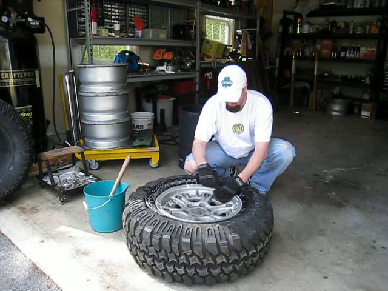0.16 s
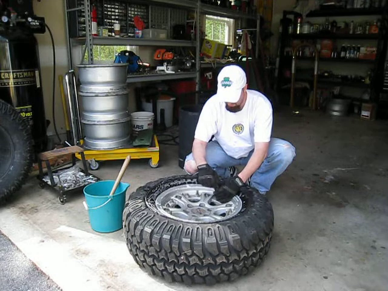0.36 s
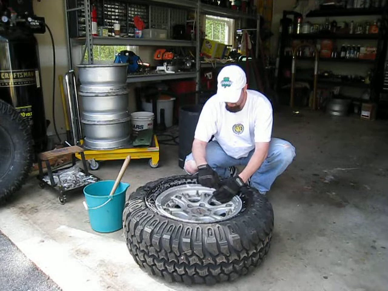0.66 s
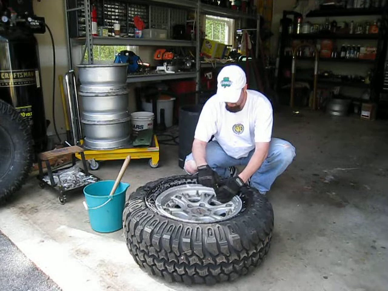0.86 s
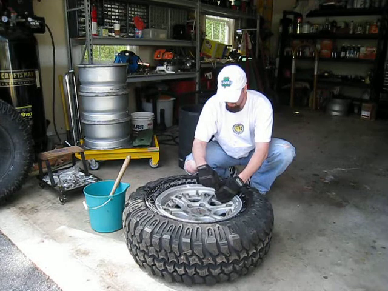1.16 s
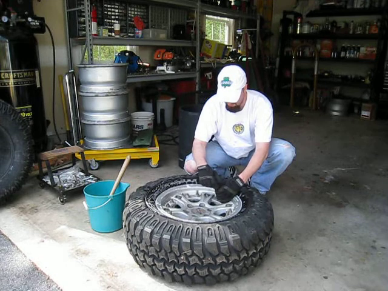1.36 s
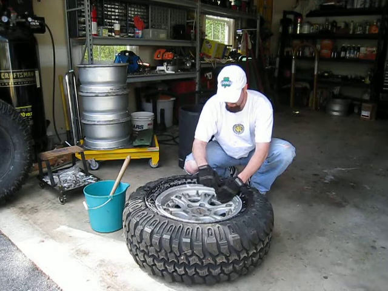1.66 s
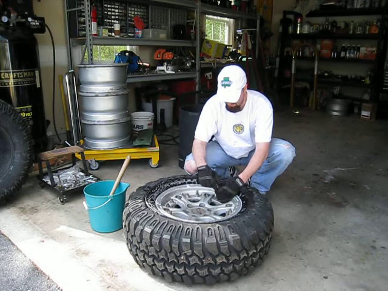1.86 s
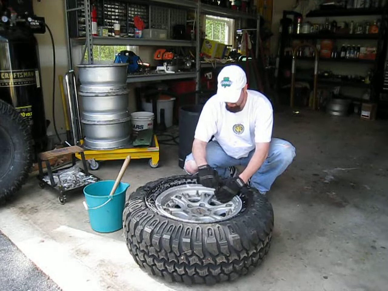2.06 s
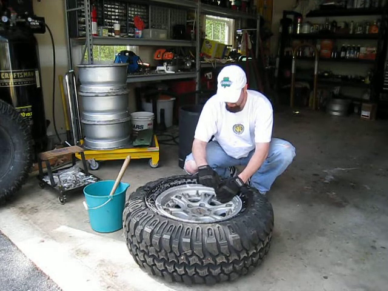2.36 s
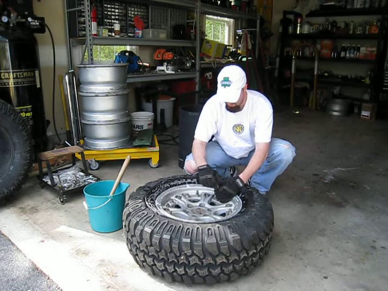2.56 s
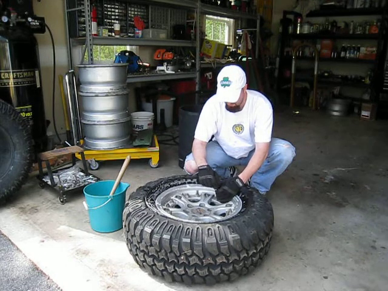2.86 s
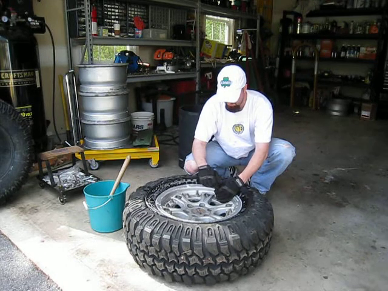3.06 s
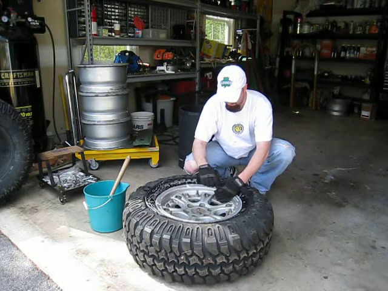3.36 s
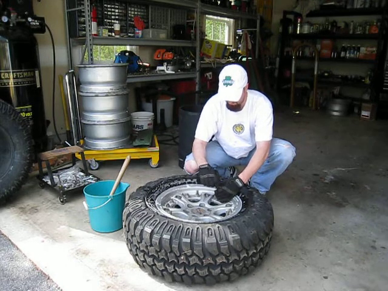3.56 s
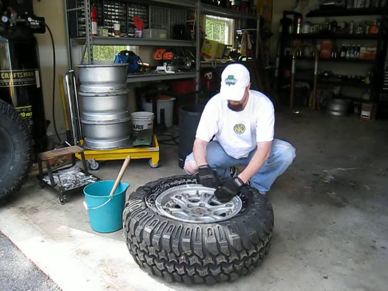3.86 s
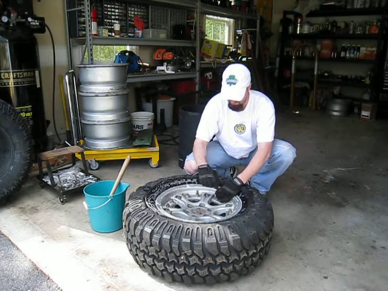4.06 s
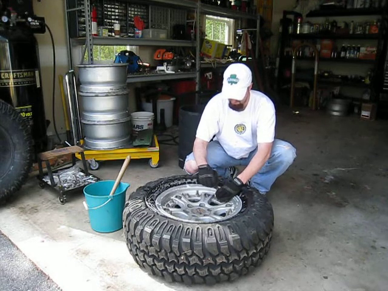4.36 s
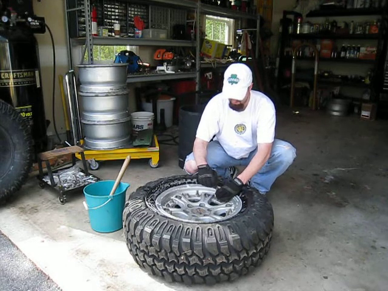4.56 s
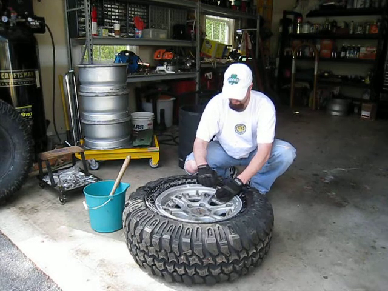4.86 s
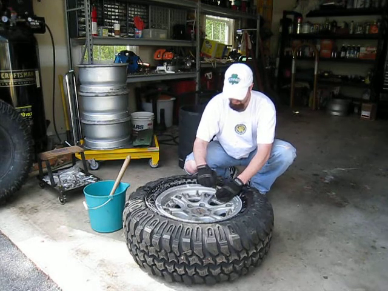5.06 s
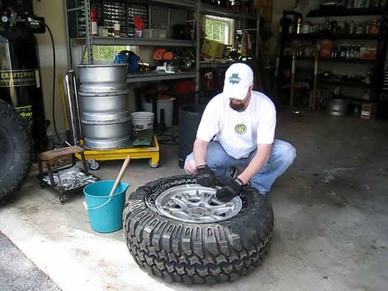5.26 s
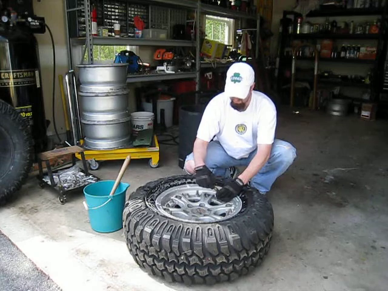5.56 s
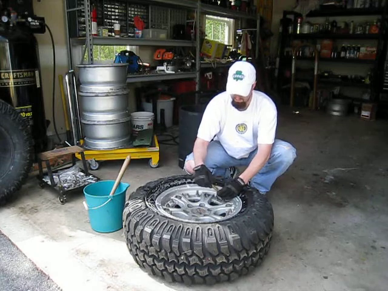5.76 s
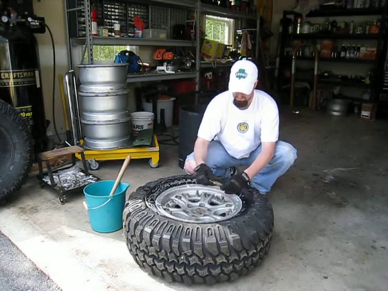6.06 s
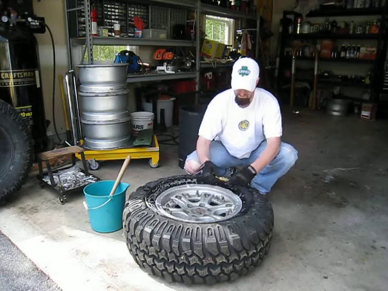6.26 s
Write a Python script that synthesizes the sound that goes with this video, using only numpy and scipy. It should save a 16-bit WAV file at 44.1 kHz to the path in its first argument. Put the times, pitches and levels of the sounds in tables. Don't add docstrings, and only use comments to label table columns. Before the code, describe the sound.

Thin stuttering air leaks with faint tool knocks over a quiet garage hum, then a sudden snap and loud, whistling, steady rush of escaping air.

```python
import sys
import numpy as np
from scipy import signal
from scipy.fft import irfft, next_fast_len
from scipy.io import wavfile
from scipy.ndimage import uniform_filter1d, map_coordinates

SR = 44100
rng = np.random.default_rng(int(sys.argv[2]) if len(sys.argv) > 2 else 0)


def attenuation_scalar(level_db):
    decades = np.asarray(level_db, float) / 20
    return 10 ** decades


def materialize(psi):
    bounded = np.clip(np.atleast_2d(psi).T, -1, 1)
    quanta = np.round(bounded * 32767).astype(np.int16)
    wavfile.write(sys.argv[1], SR, quanta)


N = 282353

# [f/Hz, density/dB]
CORE_SPECTRUM = [(2500, -19), (3500, -2.5), (5000, 0.5), (5450, 0), (6000, -0.5), (7500, -2), (10000, -1),
                 (12000, -18), (14000, -28)]
BODY_SPECTRUM = [(700, -14), (1200, 0), (1750, 1), (2400, 4), (2900, 0.5), (3300, 0), (4500, -14)]
ROAR_SPECTRUM = [(20, -25), (60, -22), (130, -26), (190, -12.5), (280, -20.5), (360, -13), (440, -16.5),
                 (500, -3), (620, -2.5), (800, 1.5), (1100, -3), (1600, -14)]

PUFF_RISE_S, PUFF_FALL_DB_S = 0.02, 600
RIM_RISE_S, RIM_FALL_DB_S = 0.035, 300


def evened(x):
    return x / np.sqrt(np.mean(x ** 2) + 1e-20)


def curve(points):
    return np.interp(np.arange(N) / SR, *np.transpose(points))


def shaped(gain):
    size = next_fast_len(N)
    hz = np.fft.rfftfreq(size, 1 / SR)
    real, imaginary = rng.standard_normal((2, len(hz)))
    spectrum = (real + 1j * imaginary) * gain(hz)
    return evened(irfft(spectrum, size)[:N])


def noise(points):
    f, db = np.transpose(points)

    def gain(hz):
        return attenuation_scalar(np.interp(np.log(hz + 1), np.log(f + 1), db, left=-90, right=-90))

    return shaped(gain)


def whistle(*peaks):
    def gain(hz):
        return sum(attenuation_scalar(db) / (1 + (2 * (hz - f) / (1.76 * width)) ** 2) for f, width, db in peaks)

    return shaped(gain)


def slow_noise(span):
    return evened(uniform_filter1d(uniform_filter1d(rng.standard_normal(N), span), span))


def eddies(depth_db, seconds):
    span = max(int(seconds * SR), 1)
    return evened(attenuation_scalar(depth_db * slow_noise(span)))


def swell(start, hold, db, rise, fall_db_s):
    t = np.arange(0, N + 40, 40) / SR - start
    fall = attenuation_scalar(db - fall_db_s * np.maximum(t - hold, 0))
    power = (np.clip(t / rise, 0, 1) * fall) ** 2
    return np.repeat(power, 40)[:N]


def staged(levels):
    # [t/s, glide/s]
    moves = [
        (4.07, 0.14),
        (5.22, 0.07),
        (6.02, 0.13),
    ]
    t = np.arange(N) / SR
    value = levels[0]
    for step, (s, glide) in zip(np.diff(levels), moves):
        value = value + step * np.clip((t - s) / glide + .5, 0, 1)
    return value


def garage():
    # [f/Hz, density/dB]
    room_spectrum = [(12, -49), (20, -10), (70, -10), (182, -6.5), (346, -7), (556, -5), (1120, -5.5),
                     (1220, -8.5), (1320, -10), (2070, -15.5), (2250, -17), (7480, -23), (15900, -20)]
    # [f/Hz, width/Hz, level/dB]
    hum_lines = [(103.6, 8.5, -67), (203, 83, -89)]
    wash = attenuation_scalar(-49.95) * noise(room_spectrum) * eddies(depth_db=0.07, seconds=0.038)
    hum = sum(attenuation_scalar(db) * whistle((hz, width, 0)) for hz, width, db in hum_lines)
    duck_s, glide_s, duck_db, creep_db_s = 3.12, 0.1, -10, -3.5
    t = np.maximum(np.arange(N) / SR - duck_s, 0)
    return attenuation_scalar(.5 + duck_db * np.minimum(t / glide_s, 1) + creep_db_s * t) * (wash + hum)


def leak():
    # [t/s, hold/s, level/dB, whistle over fizz/dB]
    puff_rows = [(-.02, 0.085, -44, 4), (0.08, 0.048, -46.5, 10), (.13, 0.051, -57, 0), (0.24, .06, -56, 3),
                 (0.287, 0.055, -41, 0), (0.335, 0.036, -41.5, 1), (.385, 0.57, -53, -1),
                 (0.388, 0.049, -52, 10), (0.514, 0.054, -49.5, -3), (0.668, 0.074, -48, 7),
                 (0.82, 0.1, -52, 3), (1.048, .02, -54, -5), (1.119, 0.061, -49, -3),
                 (1.238, 0.031, -46.5, -2), (1.312, 0.082, -51, -1), (1.335, 0.26, -55, 1),
                 (1.598, 0.16, -63, 5), (1.725, 0.061, -54.5, 11), (1.784, 0.1, -55.5, -2),
                 (1.895, 0.027, -50.5, 0), (2.096, 0.37, -51.5, 1), (2.415, 0.22, -50, -2),
                 (2.63, 0.24, -49, -2), (2.83, 0.066, -48, -3), (2.89, 0.14, -46.5, -1)]
    # [t/s, hold/s, level/dB]
    cupped_rows = [(-.02, 0.087, -54.5), (0.293, .035, -48), (0.34, 0.026, -46.5), (1.12, .03, -53),
                   (1.17, .03, -56), (1.243, 0.027, -44), (2.35, .1, -56), (2.422, 0.15, -49.5),
                   (2.649, 0.097, -49), (2.76, 0.15, -59), (2.92, .06, -53), (2.97, 0.087, -44.5)]
    # [f/Hz, width/Hz, level/dB]
    thread_peaks = [(8150, 260, -3.5), (8800, 230, -9), (9330, 170, 2), (9870, 170, 0), (10600, 220, -13)]
    edge_peaks = [(12060, 250, -7), (13100, 300, -6), (14300, 500, -13), (15300, 400, -13)]
    seat_peaks = [(5040, 380, 0), (6540, 190, -6), (4080, 160, -21)]
    # [f/Hz, density/dB]
    fizz_spectrum = [(6180, -19), (10500, 1.5), (11600, 5.5), (11800, -7), (12500, 6), (12800, -1),
                     (14200, 6), (15900, -1)]
    body_spectrum = [(940, -25), (1600, -6.5), (1710, -5), (2450, 1), (2720, -4), (4050, -2.5),
                     (5910, -2.5), (6830, -2.5), (7590, 1.5), (9440, -3.5), (11000, -7), (14300, -28),
                     (22000, -120)]

    puffs = [swell(s, hold, db, PUFF_RISE_S, PUFF_FALL_DB_S) for s, hold, db, _ in puff_rows]
    bias = [attenuation_scalar(row[3]) for row in puff_rows]
    seep = attenuation_scalar(-70) ** 2
    thin = np.sqrt(seep + sum(p * b for p, b in zip(puffs, bias)))
    fizz = np.sqrt(seep + sum(p / b for p, b in zip(puffs, bias)))
    body_follows = 0.32
    body = attenuation_scalar(-56.5) * ((seep + sum(puffs)) / attenuation_scalar(-50.5) ** 2) ** (body_follows / 2)
    cupped = np.sqrt(seep + sum(swell(*row, PUFF_RISE_S, PUFF_FALL_DB_S) for row in cupped_rows))

    air = attenuation_scalar(-3.0) * thin * whistle(*thread_peaks) * eddies(depth_db=1.5, seconds=.02)
    air += cupped * whistle((1370, 170, 0))
    bright = noise(fizz_spectrum) + 0.43 * whistle(*edge_peaks)
    air += attenuation_scalar(-1.0) * fizz * bright * eddies(depth_db=0.5, seconds=.02)
    air += (attenuation_scalar(3.0) * body + 0.51 * cupped) * (noise(body_spectrum) + 0.31 * whistle(*seat_peaks))
    return (air + squeaks()) * eddies(depth_db=.8, seconds=.005)


def squeaks():
    # [t/s, hold/s, level/dB, f/Hz]
    squeak_rows = [(.03, .05, -57, 14600), (.3, .07, -57, 14300), (.51, .07, -59, 5200),
                   (.52, .05, -54, 14100), (.68, .07, -58, 14200), (2.43, 0.068, -51, 6800),
                   (2.588, 0.05, -60, 5600), (2.812, .04, -49.5, 4580), (2.79, 0.15, -55, 6200),
                   (2.857, .1, -53, 5100)]
    white, out = rng.standard_normal(N), np.zeros(N)
    for *row, hz in squeak_rows:
        narrow = signal.lfilter(*signal.butter(2, [hz - 330, hz + 330], "band", fs=SR), white)
        out += np.sqrt(swell(*row, PUFF_RISE_S, PUFF_FALL_DB_S)) * evened(narrow)
    return out


def walls(x):
    taps = np.zeros(8040)
    at = np.arange(131, 8011, 20) + rng.integers(0, 20, 394)
    taps[at] = rng.choice([-1., 1.], len(at)) * attenuation_scalar(-60 * at / SR / 0.27)
    taps = signal.lfilter([1], [1, -.3], taps)
    taps = signal.lfilter(*signal.butter(2, 1700, "high", fs=SR), taps)
    wet = attenuation_scalar(-11.0)
    echoes = signal.oaconvolve(x, taps / np.linalg.norm(taps))[:N]
    return (x + wet * echoes) / np.sqrt(1 + wet ** 2)


def knocks():
    # [t/s, level/dB, width/s]
    thud_rows = [(0.047, -48, 0.0034), (0.119, -49, 0.0034), (0.184, -46, 0.0032), (.222, -48, 0.0038),
                 (2.98, -58, 0.0042), (3.154, -25, 0.00011), (3.157, -39, .0005), (3.162, -48, 0.0018)]
    snap_rows = [(3.176, -12, .00004), (3.2283, -12, 0.000033), (3.8995, -12, .00003),
                 (3.9022, -11, .00004), (3.9122, -15, 0.000033), (3.891, -15, .00003),
                 (3.9392, -13, .00003), (5.117, -21, .00003), (5.165, -22, .00004), (5.882, -21, .00004),
                 (5.888, -22, .00004)]
    out, t = np.zeros(N), np.arange(N) / SR
    for s, db, width in thud_rows + snap_rows:
        u = (t - s) / width
        out += attenuation_scalar(db) * (1 - u ** 2) * np.exp(-u ** 2 / 2)
    return out


def spurts():
    # [t/s, level/dB, length/s, low thump/dB]
    spurt_rows = [(3.152, -20, 0.0084, -16), (3.172, -21, 0.007, -28), (3.1805, -24, .004, -28),
                  (3.186, -26, 0.0036, -25), (3.556, -34, .012, -5), (3.965, -36, .012, -6),
                  (3.888, -29, .012, -32), (3.394, -25.5, 0.014, -25), (3.899, -26.5, 0.024, -32),
                  (5.16, -28, 0.015, -33), (5.862, -28.5, 0.05, -27), (1.258, -62, .02, 4),
                  (0.305, -52, .012, -11), (.325, -54, .01, -11), (.35, -49, .012, -11),
                  (.365, -52, .008, -11)]
    bright = noise(CORE_SPECTRUM) + 0.53 * noise(BODY_SPECTRUM)
    low = noise(ROAR_SPECTRUM)
    out, t = np.zeros(N), np.arange(N) / SR
    for s, db, length, thump_db in spurt_rows:
        u = np.clip((t - s) / length, 0, None)
        out += attenuation_scalar(db) * np.minimum(u * 5, 1) * np.exp(-u ** 1.7) * (bright + attenuation_scalar(thump_db) * low)
    return out


def side_flickers(x):
    # [t/s, lower edge f/Hz]
    flicker_rows = [(1.766, 4250), (1.766, 10340), (1.766, 11760), (1.835, 4250), (1.905, 11760),
                    (3.786, 9650), (3.789, 5900), (4.279, 13140), (4.671, 6330), (4.833, 9730),
                    (5.435, 13780), (5.506, 11760), (5.648, 9690), (5.739, 9000), (5.74, 6890),
                    (5.742, 11760), (5.946, 6330), (5.947, 14510), (6.042, 5170), (6.042, 14510),
                    (6.087, 7620), (6.088, 5250), (6.088, 13830), (6.27, 12800), (6.365, 9000),
                    (6.365, 13400), (6.368, 5730)]
    width_hz = 1200
    out, n = np.zeros(N + 2048), np.arange(2048)
    x = np.append(x, out)
    window = signal.windows.kaiser_bessel_derived(2048, 4 * np.pi)
    for s, low_hz in flicker_rows:
        k = np.arange(int(width_hz * 2048 / SR)) + low_hz * 2048 // SR
        lines = window[:, None] * np.cos(np.pi / 1024 * np.outer(n + 512.5, k + .5))
        start = round((s * SR - 160) / 1024) * 1024 + 160 - 1024
        size = np.std(x[start:start + 2048] @ lines) / 512
        out[start:start + 2048] += attenuation_scalar(-2) * size * lines @ rng.standard_normal(len(k))
    return out[:N]


def flow():
    # [t/s, level/dB]
    flow_points = [(2.9, -57), (2.98, -43), (3.035, -39), (3.048, -29), (3.14, -25.5), (3.17, -25),
                   (3.3, -25.5), (3.85, -24), (4.15, -25.5), (4.34, -26), (4.42, -25), (5.6, -25),
                   (6.12, -26), (6.4, -27)]
    # [t/s, half width/s, level/dB]
    jolts = [(3.37, 0.024, -3.5), (3.465, 0.017, 3.5), (3.6, 0.028, 0), (3.67, 0.034, -1.5),
             (3.72, 0.01, 0.5), (3.745, 0.0076, -5), (3.851, 0.016, -5), (3.91, 0.018, 1),
             (4.1, 0.011, -0.5), (4.495, 0.023, 2), (5.73, 0.057, -2), (5.89, .03, 2.5), (5.98, 0.025, 0)]
    full_flow_db = -25
    t = np.arange(0, N + 40, 40) / SR
    wobble = sum(db * np.exp(-((t - s) / width) ** 2) for s, width, db in jolts)
    shut = 600 * np.clip(flow_points[0][0] - t, 0, 1)
    return curve(flow_points) - full_flow_db + np.repeat(wobble - shut, 40)[:N]


def jet():
    # [dB per dB of flow, then level/dB with tool deep, backed, lifted, off]
    jet_parts = [
        (1, -35, -37, -34.5, -39),
        (0.7, -35.5, -39.5, -39, -43.5),
        (1.1, -32.5, -28.5, -28, -27.5),
        (0.1, -56, -57.5, -59, -52),
    ]
    # fizz [dB per dB of flow], stem against fizz [level/dB]
    fizz_follows = [1, 0.4, 0.27, 0.33]
    stem_db = [-8.5, -15, -9.5, -5.5]
    # [f/Hz, density/dB]
    spray_spectrum = [(7000, -7.5), (9500, 0), (11000, 1.5), (12700, 2), (14000, 0), (15500, 0),
                      (16500, -19)]
    # [t/s, hold/s, level/dB]
    glove_rows = [(5.95, 0.066, -43), (6.03, .06, -39.5), (3.03, 0.088, -42), (3.87, 0.18, -39)]
    rim_rows = [(3.31, 0.59, -54), (4.39, 0.23, -52), (5.19, 0.665, -44.5), (5.85, .05, -49.5),
                (6.01, 0.18, -44.5), (6.21, 0.12, -48.5)]

    flow_db = flow()
    core, body, fizz, roar = [attenuation_scalar(share * flow_db + staged(rest)) for share, *rest in jet_parts]
    core_out_s = 3.15
    held_db = curve([(core_out_s - .02, -4), (core_out_s + .02, 0)])
    steady_db = (staged(fizz_follows) - 1) * flow_db
    fizz = fizz * attenuation_scalar(steady_db + held_db)
    core = core * attenuation_scalar(0.82 * held_db)
    body = np.sqrt(body ** 2 + sum(swell(*row, RIM_RISE_S, RIM_FALL_DB_S) for row in glove_rows))
    roar = np.sqrt(roar ** 2 + sum(swell(*row, RIM_RISE_S, RIM_FALL_DB_S) for row in rim_rows))

    out = np.zeros(N)
    for level, spectrum, lift_db in ((core, CORE_SPECTRUM, 6.5), (body, BODY_SPECTRUM, -0.34),
                                     (fizz, spray_spectrum, -1.0), (roar, ROAR_SPECTRUM, 0.83)):
        out += level * attenuation_scalar(lift_db) * noise(spectrum) * eddies(depth_db=0.41, seconds=0.063)
    return out + fizz * attenuation_scalar(staged(stem_db)) * whistle((13850, 900, 0), (14300, 300, -5))


def bore():
    # [f/Hz, twin f/Hz, width/Hz, partner f/Hz, partner level/dB]
    mode_rows = [(1440, 1365, 125, 1245, -1.5), (4000, 4185, 125, 4480, -4), (6250, 6450, 250, 7000, 0),
                 (8600, 8370, 320, 9450, 3), (11400, 11660, 300, 12100, -9), (10300, 10750, 450, 9950, 2)]
    # [level/dB with tool deep, backed, lifted, off]
    resting_db = [(-40, -40.5, -50.5, -63), (-43, -32.5, -54, -51), (-29, -32, -38, -59),
                  (-30.5, -29, -39, -38), (-35, -35, -46, -48), (-44, -43, -48, -48)]
    # [t/s, hold/s, level/dB]
    song_rows = [
        [(3.04, 0.1, -29.5), (3.11, 0.056, -30), (3.16, .025, -28), (3.2, 0.19, -37.5), (3.385, 0.028, -31),
         (3.5, 0.05, -41), (3.58, 0.054, -38), (3.71, 0.047, -31.5), (3.77, 0.18, -30), (4.4, 0.29, -40.5),
         (4.62, .3, -45), (4.95, 0.23, -46), (5.15, 0.1, -39), (5.87, 0.04, -43), (5.92, .04, -46)],
        [(3.172, 0.018, -27), (3.3, .57, -36), (4.0, .1, -35), (3.22, 0.093, -29.5), (3.86, 0.18, -31),
         (4.33, 0.15, -30.5), (4.45, 0.52, -32), (4.75, 0.41, -32), (5.17, 0.12, -38), (5.86, 0.046, -37)],
        [(3.05, .08, -31), (3.17, 0.018, -20.5), (3.24, 0.084, -23.5), (3.39, 0.073, -31), (3.47, 0.19, -32),
         (3.885, 0.074, -22), (4.36, 0.12, -26.5), (4.45, 0.37, -26.5), (4.8, 0.34, -29), (5.84, 0.1, -46)],
        [(3.05, .09, -28), (3.15, 0.022, -15.5), (3.22, 0.11, -27), (3.43, 0.35, -27.5), (3.885, 0.18, -24),
         (5.16, .05, -26.5)],
        [(3.15, 0.13, -22.5), (3.43, 0.35, -26.5), (3.95, .14, -34)],
        [(3.16, .16, -31), (3.43, .2, -31), (4.11, 0.32, -27), (5.95, .2, -33)],
    ]
    # [t/s, pitch/%]
    slide_points = [
        [(3.05, -1.5), (3.12, 1), (3.17, 3), (3.3, 1.5), (3.4, -5), (3.55, -4), (3.72, 2), (3.85, 0),
         (4.0, -.5), (5.2, 0.07)],
        [(3.05, 0.4), (3.17, 8), (3.24, 4), (3.32, 1.5), (3.6, 3.5), (3.93, -1.5), (4.2, 1.5), (5.2, -0.9)],
        [(3.05, .3), (3.17, .8), (3.28, 3.5), (3.5, 1), (3.95, -0.04), (4.5, -1.5), (5.15, -2.5)],
        [(3.05, 3), (3.2, -0.4), (3.4, 0.9), (3.8, 1.1), (4.15, 0.8), (4.75, -1.9), (5.2, 0.5)],
        [(3.05, -.6), (3.26, .2), (3.6, -0.11), (4.0, -.8)],
        [(3.05, .2), (3.5, -.3), (4.2, .3)],
    ]
    # [t/s, level/dB]
    tilt_points = [(3.05, -5), (3.17, -5.5), (3.3, -2), (3.45, -2), (3.75, -6), (3.95, -6), (4.3, -9),
                   (5.2, -3), (5.5, -16)]
    lifts_db = (-3.0, -5.0, -4.5, -4.0, -3.5, -4.0)

    out, tilt_db = np.zeros(N), curve(tilt_points)
    waver_percent = .4 * slow_noise(3000)
    modes = zip(resting_db, song_rows, mode_rows, slide_points, lifts_db)
    for rest, songs, (hz, twin_hz, width, pair_hz, pair_db), slide, lift_db in modes:
        power = attenuation_scalar(staged(rest)) ** 2
        for start, hold, db in songs:
            power = power + swell(start, hold, db, 0.0059 + .07 * hold, 180)
        partner = attenuation_scalar(pair_db + tilt_db)
        doublet = whistle((hz, width, 0), (twin_hz, width, 0))
        pair = (doublet + partner * whistle((pair_hz, 1.2 * width, 0))) / np.sqrt(1 + partner ** 2)
        place = np.cumsum(1 + (curve(slide) + waver_percent) / 100)[None]
        pair = map_coordinates(pair, place, order=3, mode="mirror", prefilter=False)
        out += attenuation_scalar(lift_db) * np.sqrt(power) * pair * eddies(depth_db=1.8, seconds=.014)
    return attenuation_scalar(flow()) * out


def cavity():
    # [t/s, length/s, f/Hz, waver/Hz, level/dB]
    cavity_rows = [(3.31, .04, 195, 14, -61), (3.345, .065, 205, 12, -57), (3.295, .125, 490, 3, -55),
                   (3.51, .05, 190, 14, -66)]
    out, t = np.zeros(N), np.arange(N) / SR
    for s, length, hz, waver_hz, db in cavity_rows:
        drift = evened(uniform_filter1d(rng.standard_normal(N), 600))
        tone = np.sqrt(2) * np.sin(2 * np.pi * np.cumsum(hz + waver_hz * drift) / SR)
        out += attenuation_scalar(db) * tone * np.sin(np.pi * np.clip((t - s) / length, 0, 1)) ** .5
    return out


def bare_seat():
    left_db = [0, 0, -14, -20]
    level = np.sqrt(swell(4.35, hold=.1, db=-35, rise=.1, fall_db_s=5)) * attenuation_scalar(staged(left_db))
    return level * whistle((5790, 150, 0), (5110, 160, -5), (7270, 160, -3),
                           (2150, 300, -9), (1430, 45, -3), (2420, 120, -8))


def scene():
    rush = jet() + bore() + bare_seat()
    rush = rush * eddies(depth_db=0.5, seconds=0.022) * eddies(depth_db=0.32, seconds=0.026)
    mono = walls(leak() + rush + spurts()) + knocks() + cavity() + garage()
    return np.array([mono, mono])


def top_cut(x):
    return signal.sosfilt(signal.butter(12, 16650, fs=SR, output="sos"), x)


def record(dry):
    edge = signal.firwin(1023, 15740, window=("kaiser", 10), fs=SR)
    limited = signal.oaconvolve(dry, edge[None], "same")
    mix = limited + side_flickers(dry[0]) * [[1], [-1]]
    return top_cut(mix)


dry = scene()
out = record(dry)
materialize(out)
```